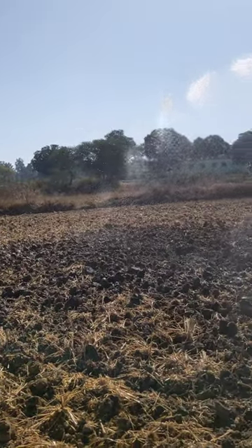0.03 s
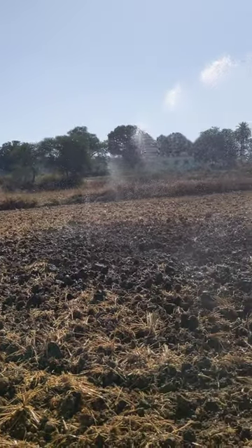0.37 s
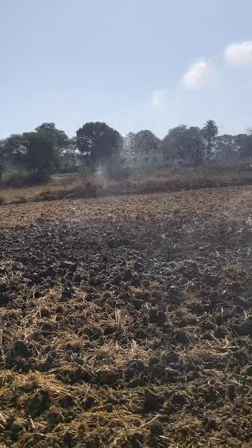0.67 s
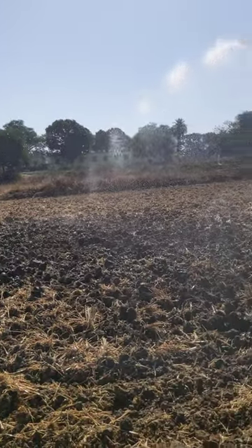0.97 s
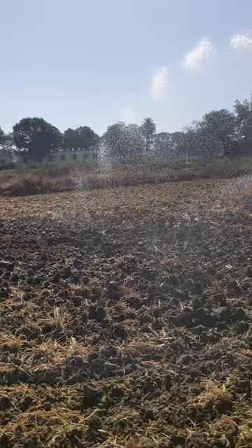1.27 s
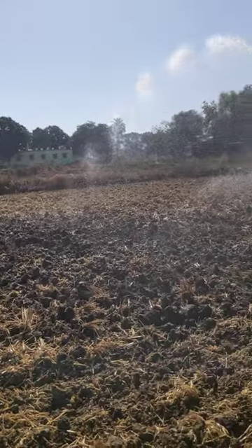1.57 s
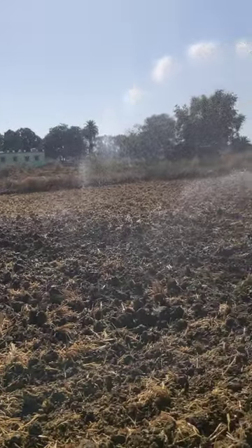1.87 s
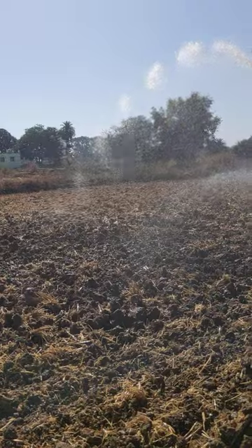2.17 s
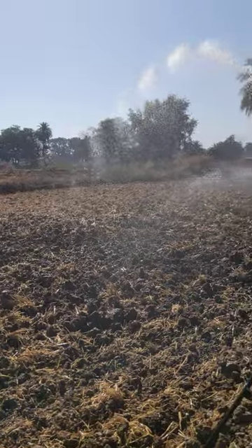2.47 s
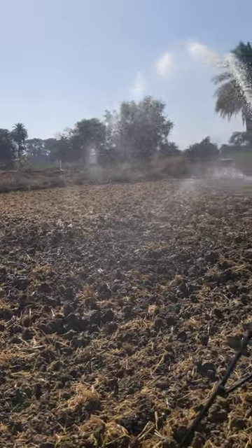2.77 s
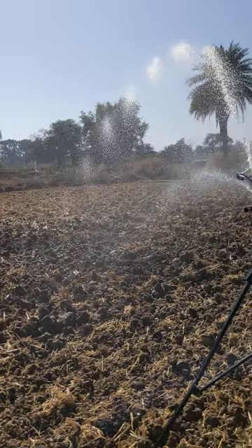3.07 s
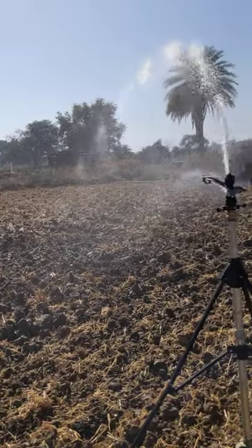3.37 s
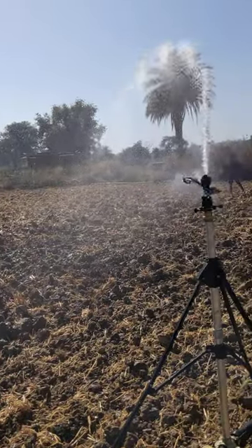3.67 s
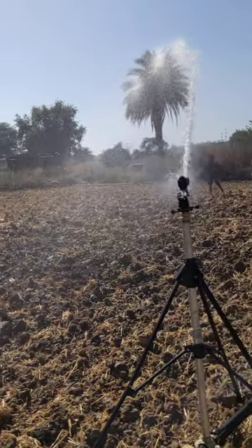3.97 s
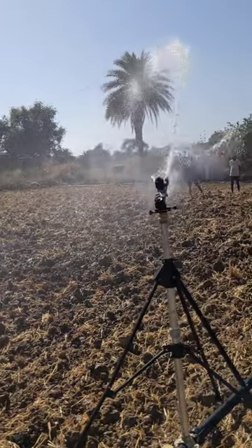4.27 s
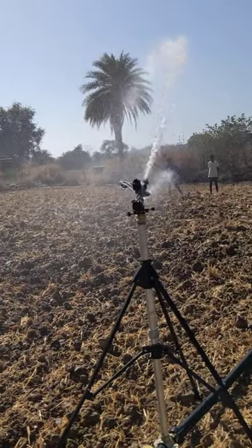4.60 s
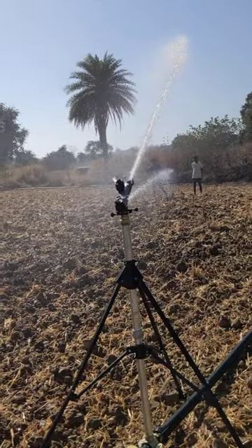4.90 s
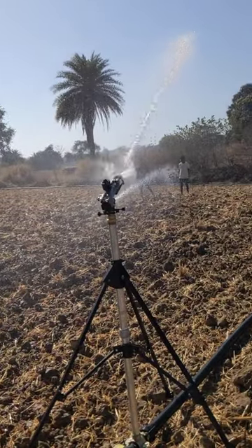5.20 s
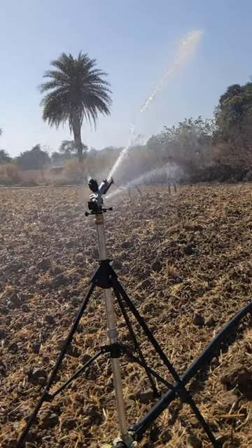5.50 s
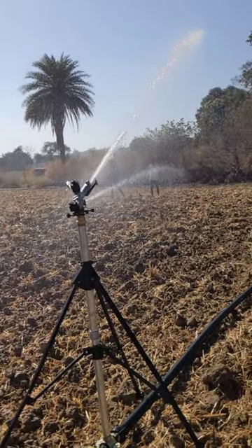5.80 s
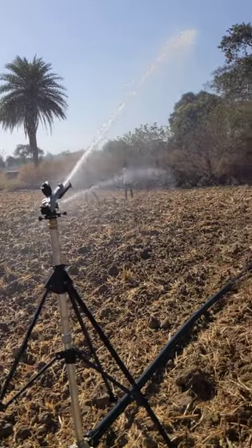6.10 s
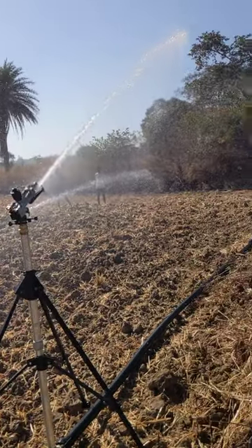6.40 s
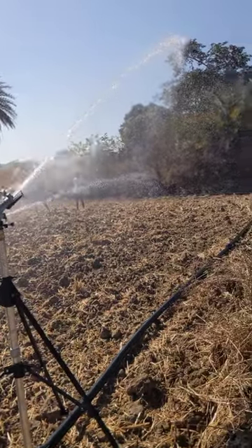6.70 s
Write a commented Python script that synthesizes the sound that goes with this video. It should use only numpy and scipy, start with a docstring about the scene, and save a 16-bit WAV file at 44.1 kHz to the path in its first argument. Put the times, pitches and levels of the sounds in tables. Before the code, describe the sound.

From the start to the end at about 7 seconds, a nearby impact sprinkler ticks evenly, about four times a second, in an open field. Each tick is a sharp, wet metallic clack with a short burst of spray, a tiny rebound and a faint dull knock from the stand. A steady, softer nozzle hiss runs underneath, with a fine patter of drops on dry soil and occasional closer splats, several between 4 and 5 seconds. The sprinkler begins on the right and drifts to the centre as the microphone turns. From about 4 seconds the ticks grow brighter and somewhat louder, with the hardest clacks around 6 to 7 seconds. A faint low rumble and hum continue in the distance. A far bird hoots very softly about once a second, and another gives one faint high peep at 2 seconds.

```python
"""Impact sprinkler on a ploughed field.

Four times a second the swing arm slaps into the jet and knocks the metal head; spray bursts off, the arm
rebounds, the tripod rings. The head turns slowly while the microphone pans across it. The nozzle hisses,
drops patter on the soil, a low drone carries over the field and far birds call."""
import sys
import numpy as np
from scipy.fft import rfft, irfft, next_fast_len
from scipy.io import wavfile
from scipy.ndimage import uniform_filter1d, map_coordinates

SR = 44100
rng = np.random.default_rng(int(sys.argv[2]) if len(sys.argv) > 2 else 0)


def persist_wave(psi):
    """Save psi, clipped to +-1, as 16-bit WAV."""
    counts = np.round(np.clip(psi, -1, 1) * 32767).astype(np.int16)
    wavfile.write(sys.argv[1], SR, np.atleast_2d(counts).T)


N = 302085
TIME = np.arange(N) / SR
EVENT_SAMPLES = 8192
AGE = np.arange(EVENT_SAMPLES) / SR
HZ = np.fft.rfftfreq(EVENT_SAMPLES, 1 / SR)
TOP_HZ = 15800

# beams of the head: (turned away [dB], facing [dB], best heading [deg], beam width [deg])
CLACK_BEAM, SPRAY_BEAM = (-2.5, 3, 46, 13.5), (-3, 2.5, 30.5, 34.5)
# beamed resonances: (frequency [Hz], width [Hz], then the four beam columns above)
BEAMED_MODES = [(2245, 510, -8, 11.5, 38, 50), (2430, 120, -1, 9, -60, 29), (7300, 290, -9, 4, -7, 19),
                (7970, 500, -11, 9, -36, 31), (8700, 160, 5.5, 25, -61, 9.3)]
# broad colour of a blow: (frequency [Hz], gain [dB])
BLOW_COLOUR = [(40, -20), (100, -14.5), (200, -9), (500, -21), (1200, -9), (2500, -2.5), (4500, -0.2),
               (7000, -2.5), (9000, -3), (10500, -7), (13500, -9.5), (15700, -7.5)]
def swing_arm(gain_db=12.5, fade_db_per_s=0.31, jitter_db=0.4):
    """Each swing: the arm cuts into the jet, strikes the head, flings spray and rebounds."""
    direct, scattered = np.zeros((1, N)), np.zeros((2, N))
    # the same faces chatter and slap the water at every blow
    contact = flatten(burst(t60_s=0.019, attack_s=0.00036))
    slap = flatten(burst(t60_s=0.036, attack_s=0.00069, delay_s=0.0023, ragged_db=7.5))
    broad_db, modes_db = colour(HZ, BLOW_COLOUR), head_resonance(HZ)
    water_db = colour(HZ, [(300, -1), (800, 2.2), (1500, 4.4), (2500, 3.5), (4000, 0.3), (8000, 4.7),
                           (15000, -6)])
    soil_db = colour(HZ, [(150, -27.5), (500, 16), (1300, 11.5), (3000, 5.5), (8000, 7.5), (14000, 8.5)])
    rebound_db = colour(HZ, [(200, -22), (700, -7), (1400, 6.5), (2400, -6), (4000, -0.5), (8000, 7.5),
                             (14000, -24)])
    for s in blow_times():
        level_db = gain_db - fade_db_per_s * s + jitter_db * rng.normal()
        clack_db = beam_db(s, *CLACK_BEAM) * bump(HZ, 3700, 2600)
        bright_db = beam_db(s, *SPRAY_BEAM)
        treble_db = bright_db / (1 + (5000 / (HZ + 1)) ** 4)
        blow_db = level_db + broad_db + clack_db + treble_db
        beamed_db = sum(beam_db(s, *beam) * bump(HZ, hz, width) for hz, width, *beam in BEAMED_MODES)
        metal_db = modes_db + beamed_db

        entry = amp(-17) * burst(t60_s=0.06, attack_s=0.004, ragged_db=3)
        add(direct, s - 0.007, ring(entry, blow_db + water_db))

        strike = amp(-5) * contact + amp(-15.5) * burst(t60_s=0.018, attack_s=0.00029)
        add(direct, s, ring(strike, blow_db + metal_db))

        spray = amp(-17.5) * slap + amp(-9.5) * burst(t60_s=0.075, attack_s=0.001, ragged_db=1)
        # a last gulp of water leaves the arm as it swings out
        gulp_gain, gulp_s = amp(rng.normal(-24, 2)), rng.normal(0.0354, 0.0014)
        spray += gulp_gain * burst(t60_s=0.08, attack_s=0.00063, delay_s=gulp_s)
        add(direct, s, ring(spray, blow_db + water_db + 0.24 * metal_db))

        rebound_gain, rebound_s = amp(rng.normal(-28, 1)), rng.normal(0.0617, 0.0017)
        rebound = rebound_gain * burst(t60_s=0.069, attack_s=0.0016, delay_s=rebound_s, ragged_db=3)
        add(direct, s, ring(rebound, level_db + bright_db + rebound_db))

        # clods and stubble scatter the blow back
        echo = amp(-10) * burst(t60_s=0.098, attack_s=0.0013, channels=2, ragged_db=0.5)
        add(scattered, s, ring(echo, blow_db + soil_db + 0.35 * metal_db))
    return pan(direct[0]) + scattered


# resonances of arm and head: (frequency [Hz], width [Hz], gain [dB])
HEAD_MODES = [(737, 192, 12), (996.4, 41, 12.5), (1525, 228, 15.5), (1905, 114, 4.5), (2220, 178, 9.5),
              (2682, 113, 9.5), (3536, 200, 10), (4200, 360, 8), (6348, 100, 16), (6840, 260, 12),
              (7980, 580, 11), (9000, 120, 1), (9400, 220, 8.5), (11960, 73, 17.5), (11700, 170, -3.5),
              (15500, 200, 4)]
def head_resonance(hz):
    """Summed gain of the metal's modes in dB."""
    return sum(db * bump(hz, centre, width) for centre, width, db in HEAD_MODES)


def blow_times(count=29, first_s=-0.0137, swing_s=0.23865, growth_s=0.000205):
    """The arm runs down slowly: each swing lasts a little longer than the one before."""
    swings = swing_s + growth_s * np.arange(count - 1)
    return first_s + np.append(0, np.cumsum(swings))


def facing(s, best_deg, width_deg, start_deg=-65, turn_deg_per_s=17):
    """Aim of a turning beam at the microphone, 0-1; at heading 0 the jet points away."""
    heading_deg = start_deg + turn_deg_per_s * s
    return np.exp(-((heading_deg - best_deg) / width_deg) ** 2)


def beam_db(s, away_db, facing_db, best_deg, width_deg):
    """Gain that swells as a beam sweeps past the microphone."""
    return away_db + (facing_db - away_db) * facing(s, best_deg, width_deg)


# low modes of the legs: (frequency [Hz], level [dB], t60 [s])
TRIPOD_MODES = [(237.4, -43, 0.12), (281, -50, 0.15), (409, -61, 0.21)]
def tripod():
    """Each blow kicks the legs into a dull knock, louder in the spray's beam."""
    knocks = np.zeros(N)
    knock = sum(amp(db - 60 * AGE / t60) * np.sin(2 * np.pi * hz * AGE) for hz, db, t60 in TRIPOD_MODES)
    for s in blow_times():
        add(knocks, s, amp(0.5 * beam_db(s, *SPRAY_BEAM) + rng.normal()) * knock)
    return knocks


# nozzle hiss: (frequency [Hz], gain [dB])
HISS_COLOUR = [(300, -35), (600, -4), (750, -9), (1150, -4.5), (1550, -8.5), (2000, -4), (2700, -7.5),
               (3500, -5), (5000, -2), (7000, -2), (8800, -0.5), (11000, -5), (13000, -3.5), (15500, -1.5)]
# beamed hiss: (frequency [Hz], width [Hz], facing level [dB], best heading [deg], beam width [deg])
JET_BANDS = [(7040, 290, -60.5, -16, 34), (9100, 690, -60, 27, 22), (1585, 200, -66.5, 15, 66),
             (6460, 2600, -56, 47, 11), (15200, 1200, -65, 48, 35)]
def jet(start_db=-47, rise_db_per_s=0.21):
    """The nozzle hisses, spits and whistles; the stream breaks into a wide, fluttering mist."""
    nozzle = pan(rng.standard_normal(N) * amp(3.64 * wobble(70) + 2.3 * wobble(500)), offset_ms=0.011)
    mist = rng.standard_normal((2, N)) * amp(1.2 * wobble(30) + 2.2 * wobble(400))
    stream = nozzle + amp(2.5) * mist
    hiss = filtered(stream, lambda hz: amp(colour(hz, HISS_COLOUR) + 0.31 * head_resonance(hz)))
    # louder as the microphone turns towards the nozzle
    hiss = unit_rms(hiss) * amp(start_db + rise_db_per_s * TIME)
    whistles = sum(amp(db) * facing(TIME, *beam) * noise_band(hz, width)
                   for hz, width, db, *beam in JET_BANDS)
    return (hiss + whistles) * amp(0.71 * wobble(17))


# big drops close by: (time [s], level [dB])
NEAR_DROPS = [(0.789, -47), (1.328, -36), (1.788, -48), (2.221, -33.5), (4.138, -31.5), (4.536, -34),
              (4.752, -34), (4.965, -36.5), (5.908, -41.5), (6.119, -39), (6.825, -33)]
# patter, least while the jet points away: (time [s], gain [dB])
PATTER_GAIN = [(0, 4), (2.5, 1.5), (3.5, -2), (5.1, -2), (5.9, 5.5)]
def patter(count=2400, tick_hz=6800, tick_t60_s=0.003, splat_t60_s=0.015):
    """Drops hit dry soil and straw: many faint ticks, each at its own pitch, and a few near splats."""
    drops = np.zeros((2, N))
    t = AGE[:400]
    sides = np.array([[1], [-1]])
    for s, size in zip(rng.uniform(0, N / SR, count), rng.exponential(size=count)):
        hz = min(tick_hz * np.exp(0.3 * rng.normal()), TOP_HZ)
        tick = np.sin(2 * np.pi * hz * t + rng.normal(0, 1, (2, 1))) * amp(-60 * t / tick_t60_s)
        tick_db = -52 + 6.14 * min(size, 3.5)
        add(drops, s, amp(tick_db + rng.normal(0, 4.1) * sides) * tick)
    for s, db in NEAR_DROPS:
        splat = rng.standard_normal(len(t)) * amp(-60 * t / splat_t60_s)
        add(drops, s, amp(db + 5 + rng.normal(0, 3.6) * sides) * splat)
    soil = [(500, -21), (2500, -19), (6500, -4), (9000, -2), (11000, -7.5), (15000, -9)]
    gain_db, = over_time(PATTER_GAIN)
    return amp(gain_db) * filtered(drops, lambda hz: amp(colour(hz, soil)))


# far rumble: (frequency [Hz], gain [dB])
RUMBLE_COLOUR = [(22, -27), (35, -45), (52, -2.5), (78, 1), (105, -10.5), (135, -6), (190, -7), (260, -5.5),
                 (350, -12), (450, -10), (560, -18), (750, -7.5), (1200, -29), (3000, -58)]
# hum lines: (frequency [Hz], level [dB])
HUM_LINES = [(52, -64), (131, -64.5)]
def drone(rumble_db=-57.5):
    """A far rumble with a wavering hum, nearly the same in both channels."""
    noise = rng.standard_normal(N) + amp(-10.5) * rng.standard_normal((2, N))
    rumble = unit_rms(filtered(noise, lambda hz: amp(colour(hz, RUMBLE_COLOUR))))
    hum = sum(amp(db + 2 * wobble(6)) * np.sin(2 * np.pi * hz * TIME + wobble(10))
              for hz, db in HUM_LINES)
    return amp(rumble_db) * rumble + hum


# far hoots: (time [s])
HOOT_TIMES = [.45, 1.14, 1.85, 2.52, 3.71, 4.93, 6.22, 6.83]
def birds(hoot_hz=816, hoot_db=-56, peep_s=2.0, peep_hz=3160, peep_db=-55):
    """One bird hoots softly, another peeps once: pure tones, each rising slightly."""
    song = np.zeros(N)
    t = AGE - AGE.mean()
    envelope = np.exp(-(t / 0.031) ** 2)
    calls = [(s, hoot_hz, hoot_db) for s in HOOT_TIMES] + [(peep_s, peep_hz, peep_db)]
    for s, hz, db in calls:
        add(song, s + t[0], amp(db) * envelope * np.sin(2 * np.pi * hz * (t + 0.32 * t ** 2)))
    return song


# sprinkler bearing: (time [s], left lag [ms], left minus right [dB])
PAN_PATH = [(0.2, 0.17, -8), (3.1, 0.11, -3), (6.0, 0.063, -1), (6.7, 0.033, -0.2)]
def pan(x, offset_ms=0):
    """Sound reaches the moving microphone's two ports with a lag and a level difference."""
    lag_ms, pan_db = over_time(PAN_PATH)
    half_lag = (lag_ms + offset_ms) * SR / 2000
    return np.array([map_coordinates(x, [np.arange(N) - side * half_lag], order=5)
                     * amp(side * pan_db / 2) for side in (1, -1)])


# port colour: (frequency [Hz], left minus right [dB])
PORT_BALANCE = [(300, 1.5), (700, 0), (1000, 2), (1550, -2), (2050, 3), (2600, -0.5), (3200, -4), (3900, 4),
                (4900, -2), (6600, 2.5), (8800, 5), (11400, -1), (14500, 2.5)]
def port_response(hz):
    """The two microphone ports colour sound differently, at constant total power."""
    return np.sqrt(2 / (1 + amp(np.array([[-2], [2]]) * colour(hz, PORT_BALANCE))))


def burst(t60_s, attack_s, delay_s=0, channels=1, ragged_db=0):
    """Dying noise of energy 1 a channel; ragged_db breaks it into clumps of about 1 ms."""
    t = np.maximum(AGE - delay_s, 0)
    clumps = unit_rms(uniform_filter1d(rng.standard_normal(EVENT_SAMPLES), size=48))
    envelope = amp(ragged_db * clumps - 60 * t / t60_s) * (1 - np.exp(-t / attack_s))
    return unit_rms(rng.standard_normal((channels, EVENT_SAMPLES)) * envelope) / np.sqrt(EVENT_SAMPLES)


def ring(x, colour_db):
    """Minimum-phase filter: resonances ring after the blow."""
    cepstrum = irfft(np.log(amp(colour_db)))
    fold = 1 + np.sign(EVENT_SAMPLES / 2 - np.arange(EVENT_SAMPLES))
    fold[0] = 1
    return irfft(rfft(x) * np.exp(rfft(cepstrum * fold)))


def flatten(x):
    """Give a burst equal energy in every narrow band."""
    power = np.abs(uniform_filter1d(np.abs(rfft(x)) ** 2, size=16))
    return ring(x, -10 * np.log10(power + 1e-9))


def noise_band(centre_hz, width_hz):
    """Resonant noise, rms 1."""
    return unit_rms(filtered(rng.standard_normal(N), lambda hz: bump(hz, centre_hz, width_hz)))


def filtered(x, response):
    """Zero-phase filter of gain response(hz)."""
    size = next_fast_len(N + EVENT_SAMPLES)
    return irfft(rfft(x, size) * response(np.fft.rfftfreq(size, 1 / SR)), size)[..., :N]


def wobble(rate_hz):
    """Smooth random curve."""
    return map_coordinates(rng.standard_normal(int(N * rate_hz / SR) + 4), [TIME * rate_hz])


def bump(hz, centre_hz, width_hz):
    """Resonance shape of height 1."""
    return 1 / (1 + (2 * (hz - centre_hz) / width_hz) ** 2)


def colour(hz, points):
    """Interpolate (frequency [Hz], gain [dB]) points on a log axis."""
    knots_hz, db = np.transpose(points)
    return np.interp(np.log(hz + 1), np.log(knots_hz + 1), db)


def over_time(rows):
    """Interpolate (time [s], values...) rows at every sample."""
    knots_s, *columns = np.transpose(rows)
    return [np.interp(TIME, knots_s, column) for column in columns]


def add(track, s, x):
    """Mix x into the track at time s."""
    start = round(s * SR)
    a, b = max(start, 0), min(start + x.shape[-1], N)
    if b > a:
        track[..., a:b] += x[..., a - start:b - start]


def amp(db):
    """Decibels to gain."""
    return 10 ** (np.asarray(db) / 20)


def unit_rms(x):
    """Scale to rms 1."""
    return x / np.sqrt(np.mean(x ** 2) + 1e-20)


def scene():
    """Sprinkler and drops, coloured by the ports, over the far sounds."""
    near = swing_arm() + tripod() + jet() + patter()
    return filtered(near, port_response) + drone() + birds()


def record(dry):
    """Steep low-pass at the recorder's band limit."""
    return filtered(dry, lambda hz: 1 / (1 + (hz / TOP_HZ) ** 200))


dry = scene()
out = record(dry)
persist_wave(out)
```